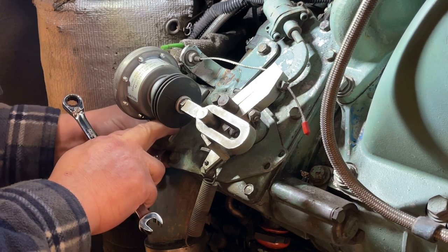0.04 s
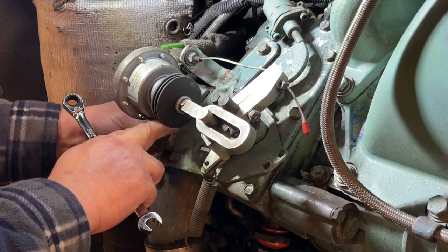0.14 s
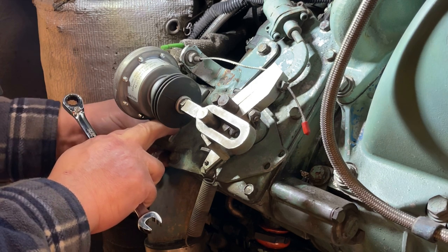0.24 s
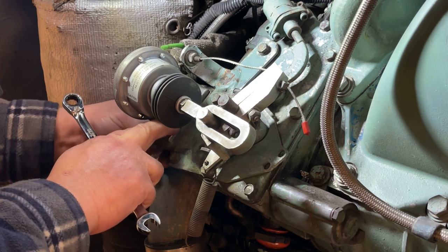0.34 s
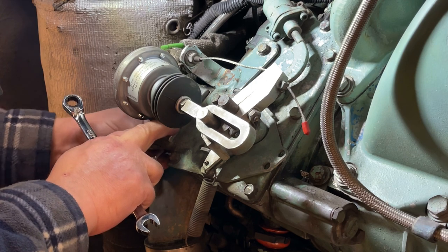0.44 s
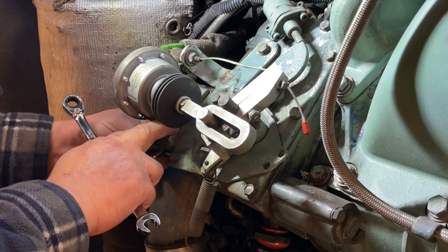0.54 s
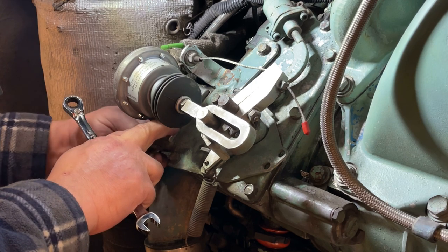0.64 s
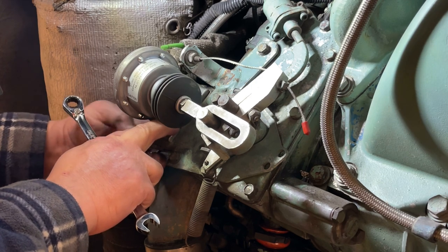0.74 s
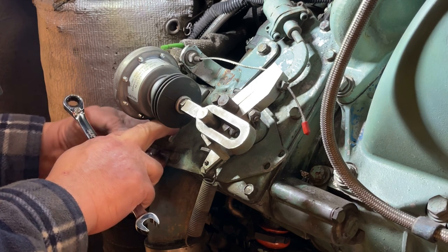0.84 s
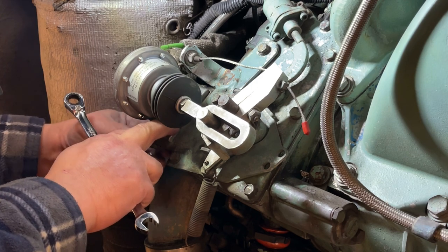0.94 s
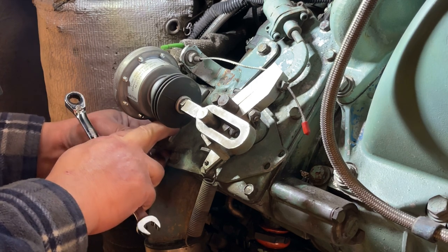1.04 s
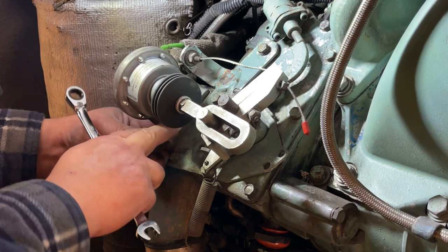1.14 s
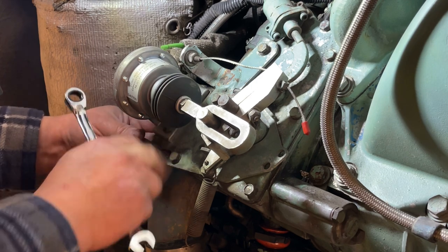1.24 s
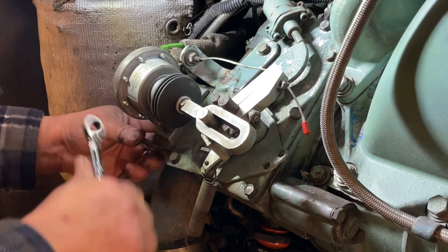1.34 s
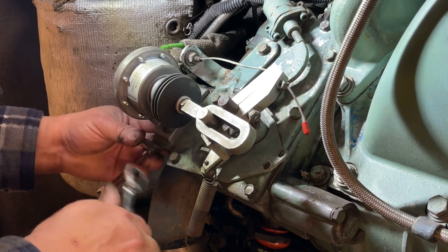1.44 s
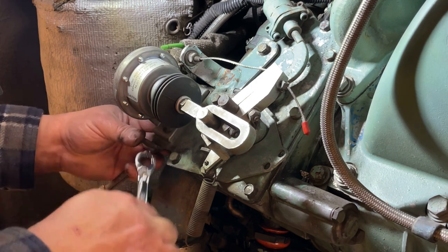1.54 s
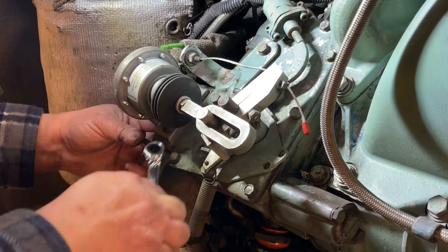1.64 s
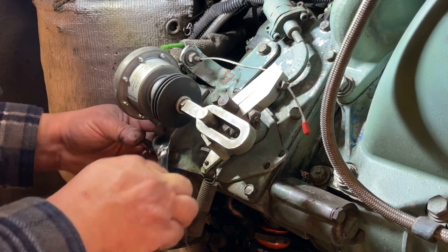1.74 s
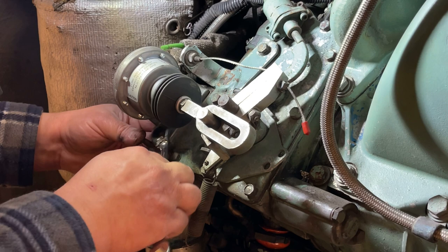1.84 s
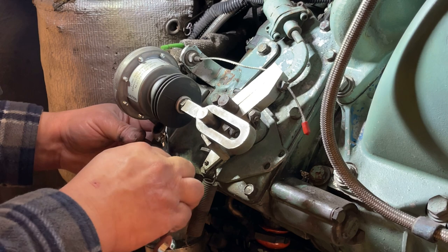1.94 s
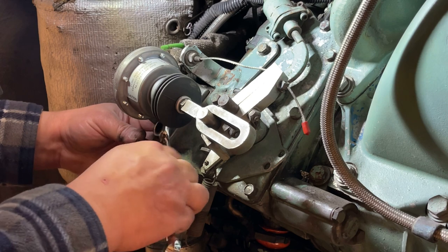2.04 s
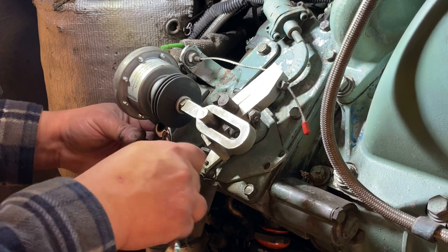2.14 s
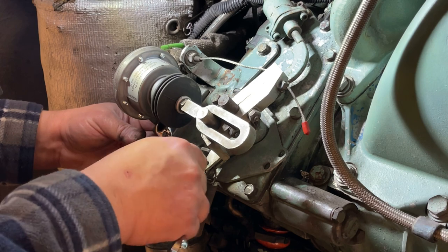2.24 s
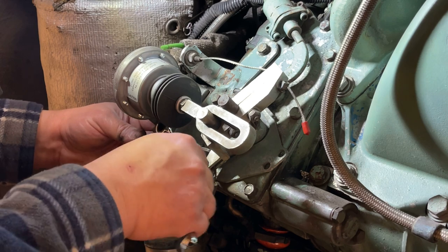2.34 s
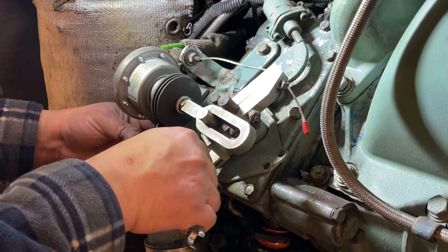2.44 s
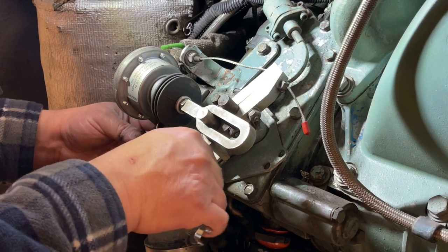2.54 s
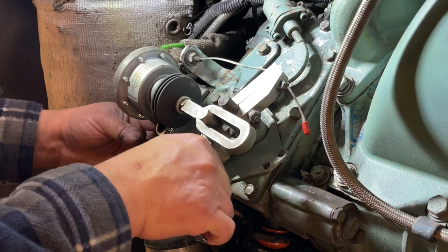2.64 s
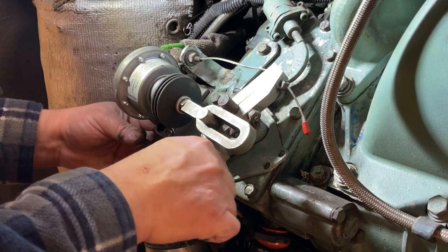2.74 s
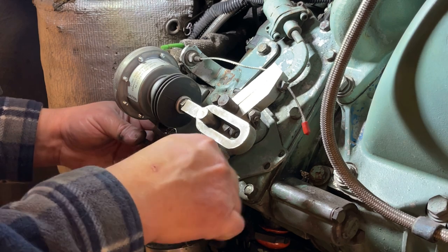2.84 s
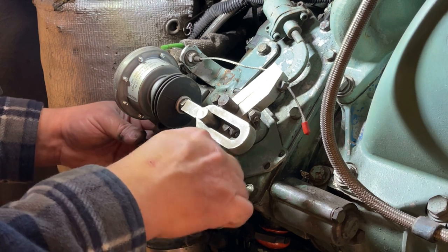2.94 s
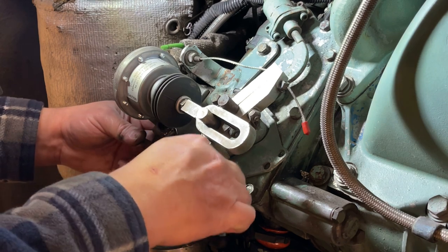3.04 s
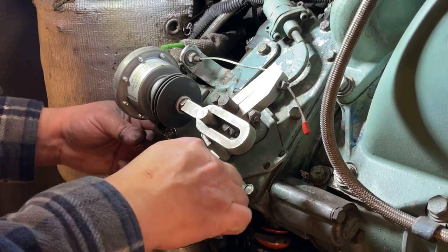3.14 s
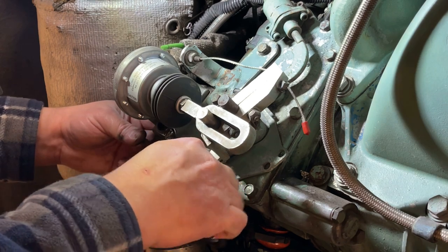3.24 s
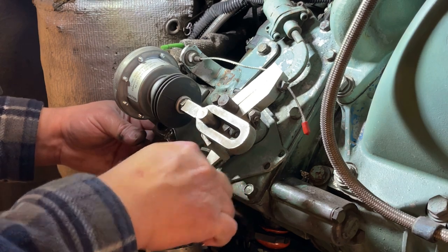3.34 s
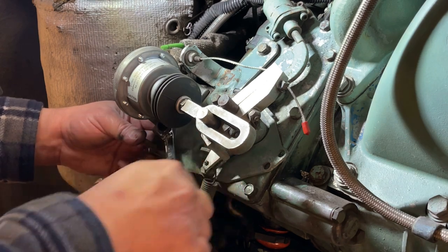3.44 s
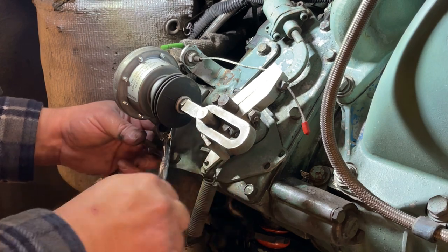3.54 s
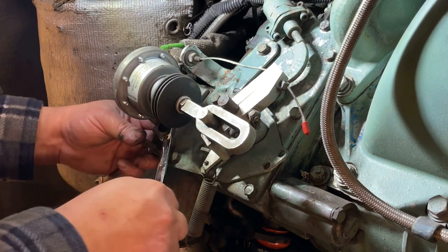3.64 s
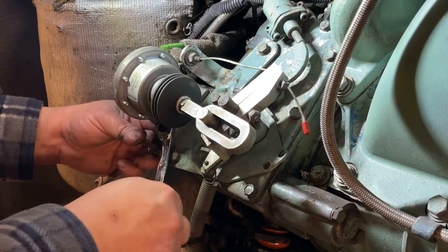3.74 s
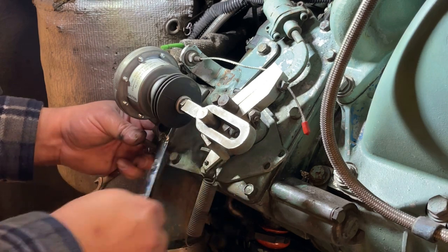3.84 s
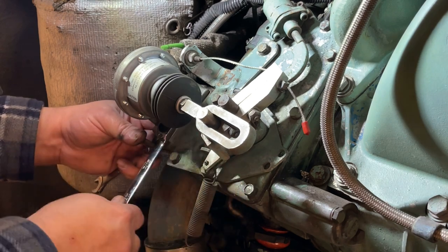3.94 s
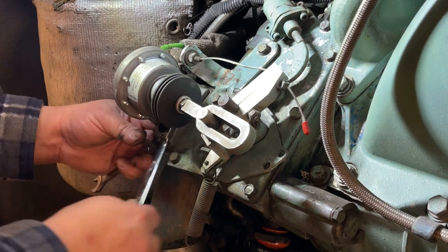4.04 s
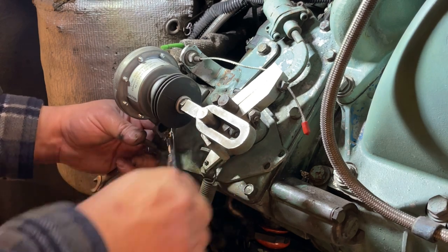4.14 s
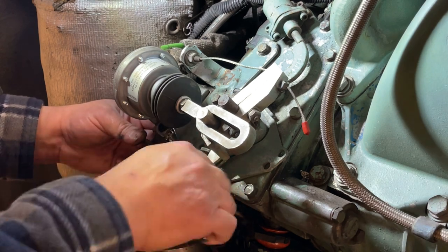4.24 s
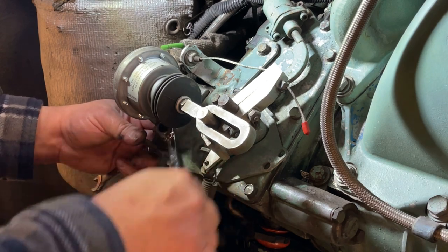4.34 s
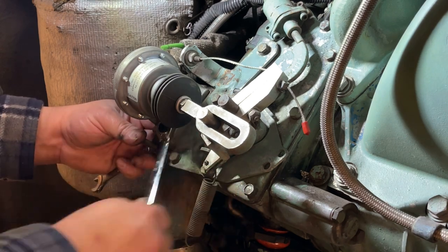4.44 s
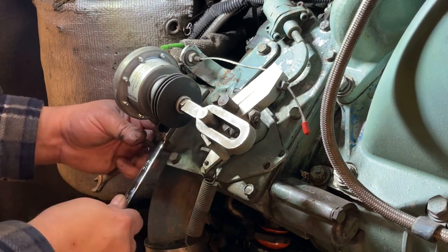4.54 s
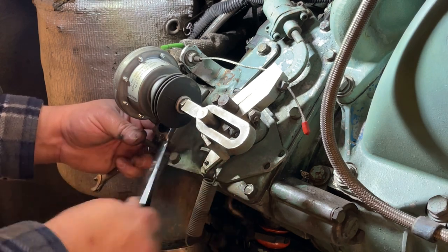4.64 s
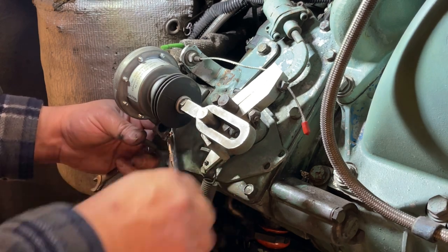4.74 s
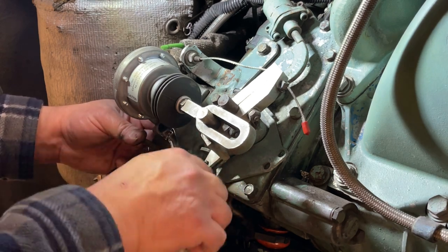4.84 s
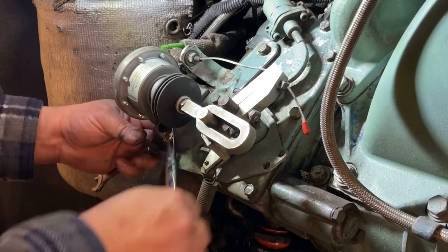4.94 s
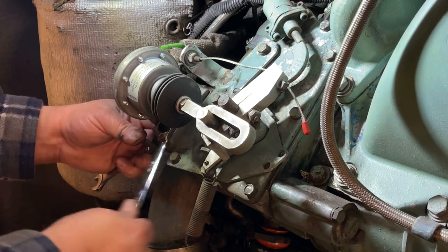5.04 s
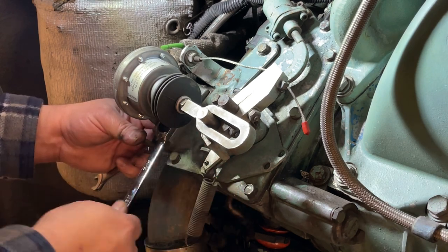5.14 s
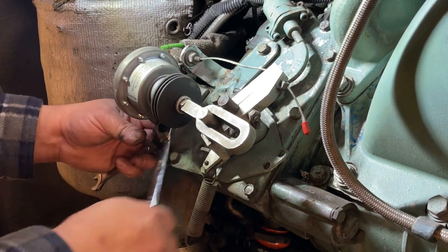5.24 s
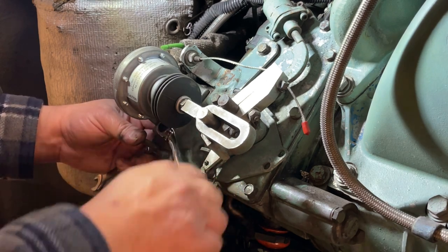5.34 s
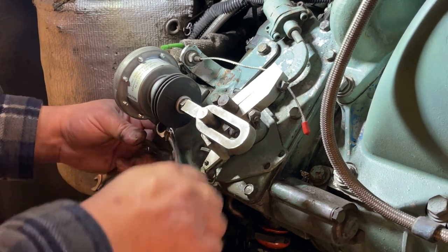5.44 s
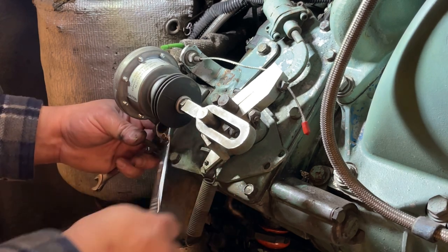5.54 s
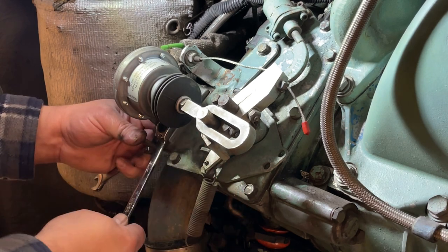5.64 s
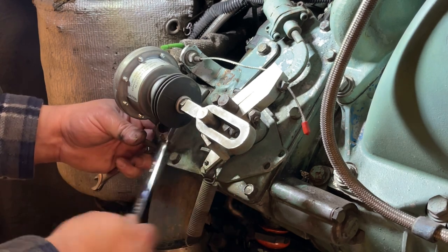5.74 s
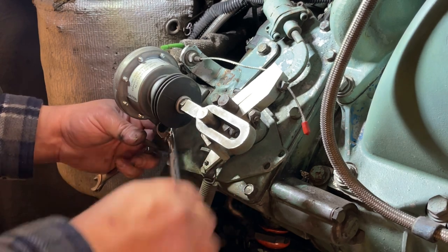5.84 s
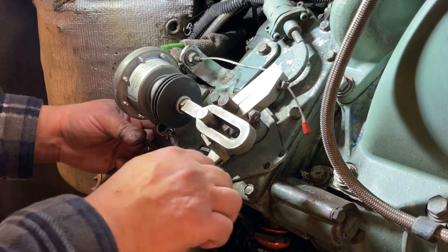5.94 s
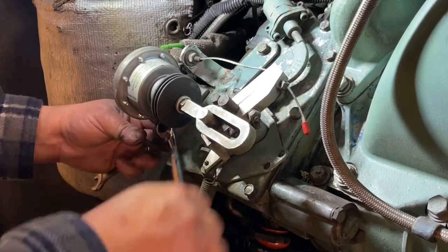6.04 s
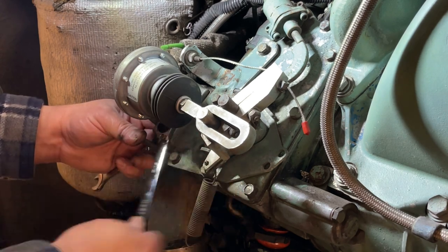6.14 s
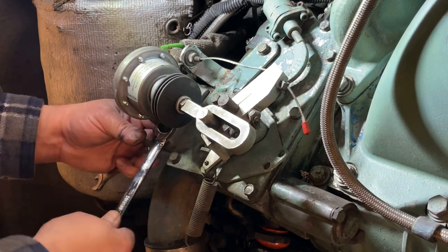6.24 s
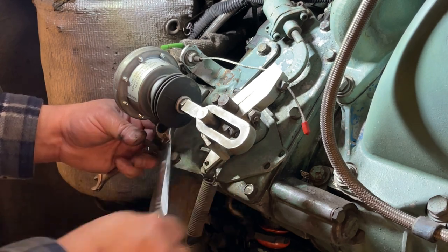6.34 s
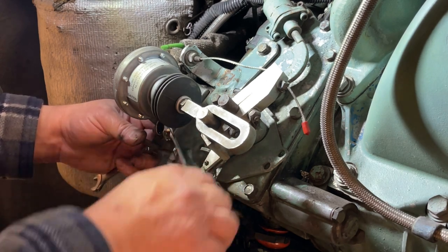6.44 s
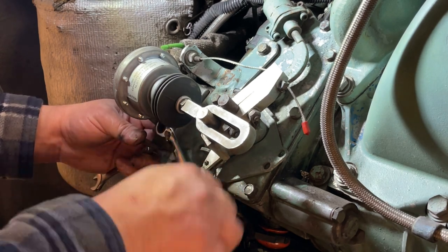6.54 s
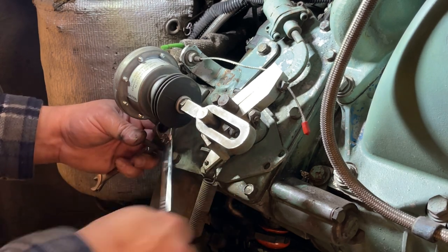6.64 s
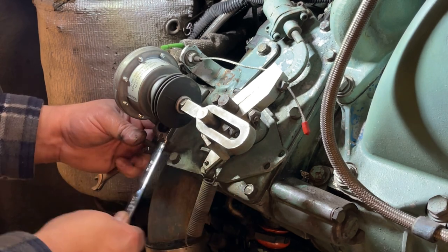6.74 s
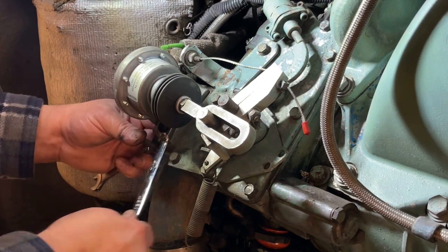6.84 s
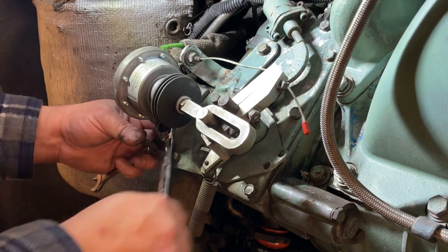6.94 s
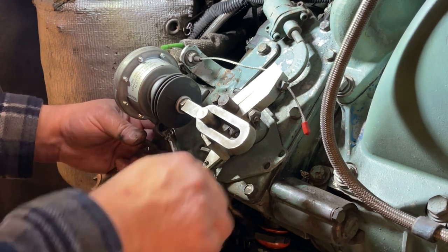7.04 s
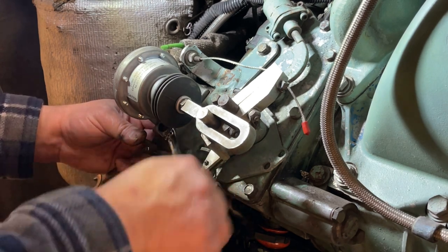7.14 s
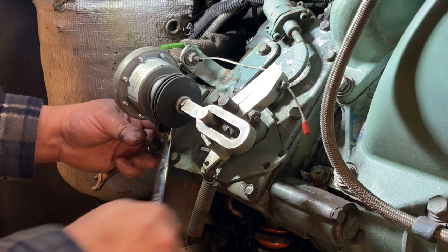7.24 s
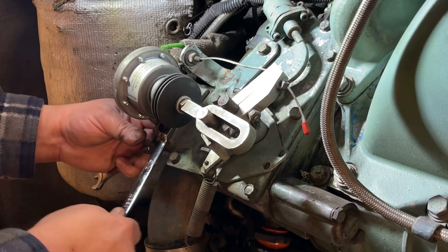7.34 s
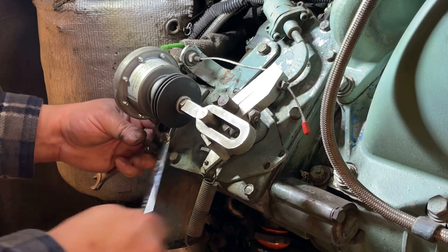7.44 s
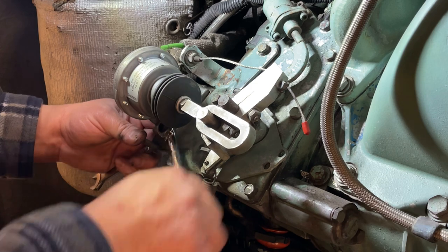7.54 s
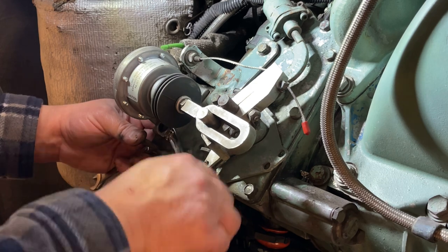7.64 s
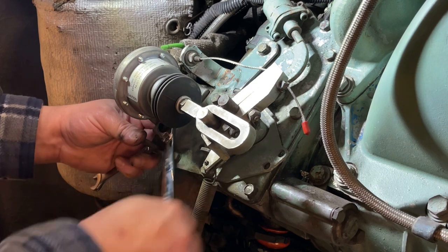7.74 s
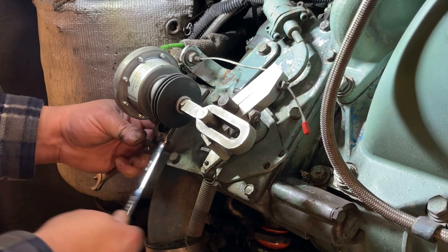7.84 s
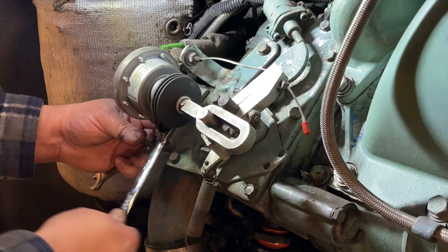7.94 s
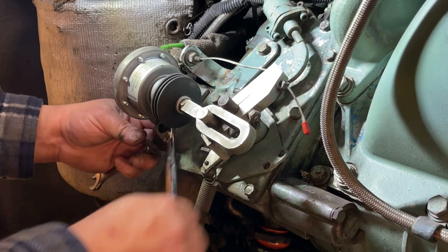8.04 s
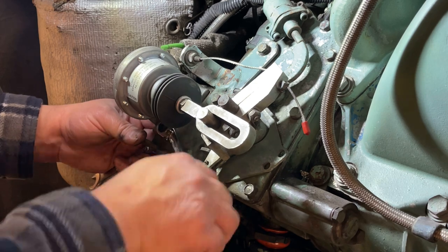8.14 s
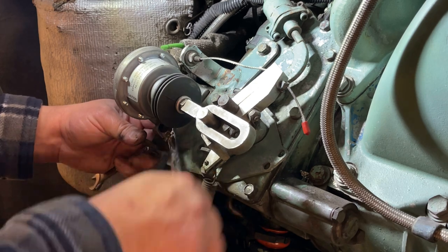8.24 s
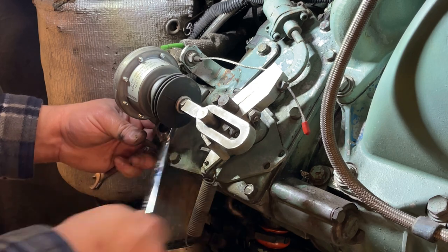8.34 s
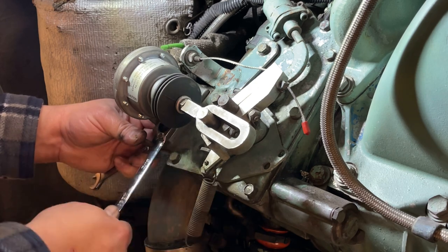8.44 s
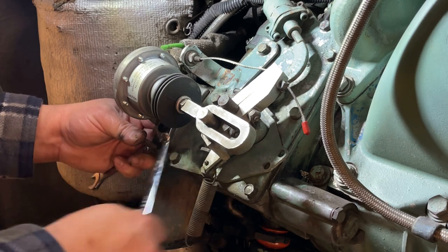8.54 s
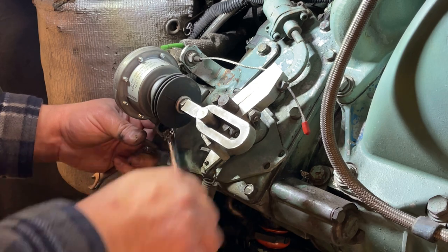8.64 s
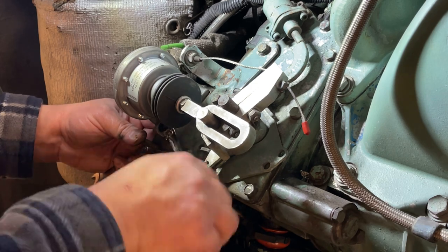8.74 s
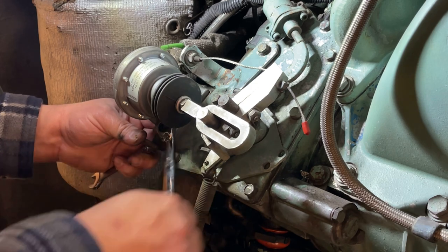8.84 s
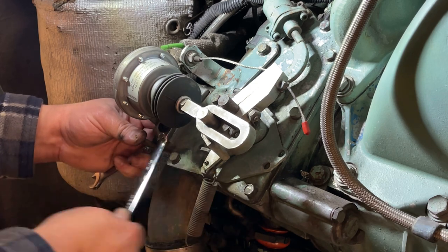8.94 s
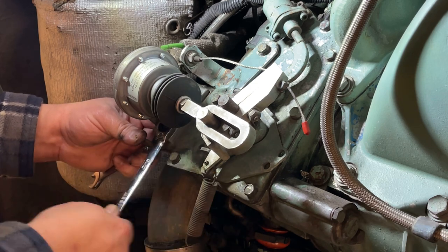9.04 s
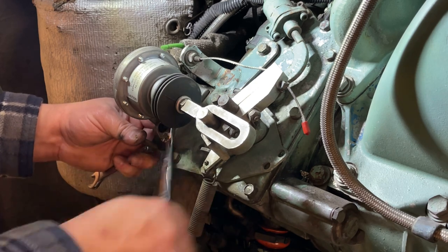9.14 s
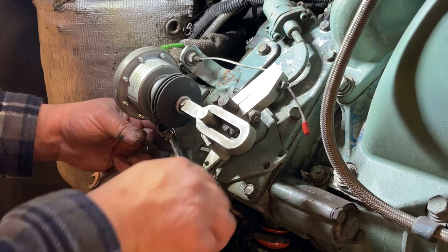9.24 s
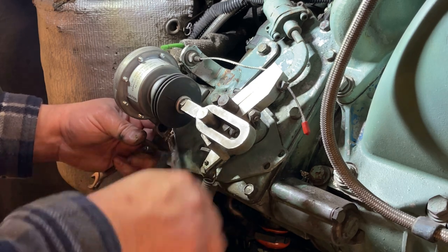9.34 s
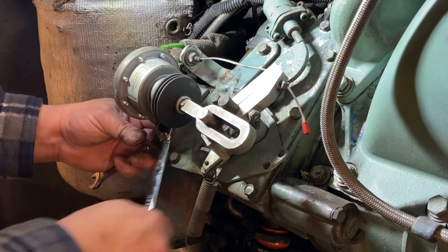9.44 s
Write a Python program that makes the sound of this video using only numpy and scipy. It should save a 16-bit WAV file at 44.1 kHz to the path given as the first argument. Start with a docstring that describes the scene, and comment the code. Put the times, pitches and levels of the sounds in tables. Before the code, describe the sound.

A ratcheting spanner is set on an engine bolt with taps and a sharp clank, then clicks through repeated swings in a small workshop.

```python
"""A small workshop with a low rumble. A ratcheting ring spanner is set on an engine bolt with a few
taps, faint scrapes and one sharp clank, then swung ten times. On each back swing the pawl rides up
and snaps over seven to nine teeth; between swings the spanner knocks on the bolt as it takes up load.
A sleeve rubs, engine parts scatter every click, and the room answers."""
import sys
import numpy as np
from scipy import signal
from scipy.fft import rfft, irfft, next_fast_len
from scipy.io import wavfile

SR = 44100
rng = np.random.default_rng(int(sys.argv[2]) if len(sys.argv) > 2 else 0)


def put_to_file(sound):
    """Save the sound as 16-bit audio at rate SR, in the file named by the first command-line argument."""
    columns = np.atleast_2d(sound).T  # one column per channel
    safe = np.clip(columns, -1, 1)
    whole_steps = np.round(safe * 32767)
    wavfile.write(sys.argv[1], SR, whole_steps.astype(np.int16))


N = 418509
HIT_SIZE = 8192
T = np.arange(HIT_SIZE) / SR
HZ = np.fft.rfftfreq(HIT_SIZE, 1 / SR)
# back swings: start/s, length/s, teeth, start and end speed over midway speed,
# first, middle and last click/dB, extra shank level/dB
SWINGS = [(4.0119, .18, 9, 1.09, .25, -23.5, -20.5, -25.5, 0),
          (4.6065, .1352, 8, 1.12, .44, -28, -21.5, -25, -1),
          (5.1794, .1156, 8, .98, .5, -27.5, -25, -27.5, -1),
          (5.7219, .1432, 9, 1.43, .49, -26, -24, -25, -2.5),
          (6.2734, .0865, 7, .86, .18, -26, -22, -29, -2.5),
          (6.844, .164, 8, .92, .59, -27, -22.5, -29.5, 1.5),
          (7.4028, .1304, 8, 1.26, .53, -26.5, -22.5, -26.5, 1.5),
          (7.9437, .1253, 9, .9, .24, -28.5, -23, -28, -2),
          (8.4944, .1421, 9, 1.57, .58, -23, -22.5, -25.5, -1.5),
          (9.0599, .135, 9, 1.28, .33, -30.5, -22.5, -25.5, -1)]


def amp(db):
    """Decibels to gain."""
    return 10 ** (np.asarray(db) / 20)


def unit(x):
    """Scale to rms 1."""
    return x / np.sqrt(np.mean(x ** 2) + 1e-20)


def along(points, hz):
    """Read (f/Hz, value) points on a log axis."""
    f, v = np.transpose(points)
    return np.interp(np.log(hz + 1), np.log(f + 1), v)


def filtered(x, response):
    """Apply a complex frequency response."""
    size = next_fast_len(N + SR // 2)
    return irfft(rfft(x, size) * response(np.fft.rfftfreq(size, 1 / SR)), size)[..., :N]


def coloured(x, colour):
    """Filter by (f/Hz, level/dB) points."""
    return filtered(x, lambda hz: amp(along(colour, hz)))


def add(track, start_s, sound):
    """Mix a sound into a track."""
    start = max(round(start_s * SR), 0)
    part = track[..., start:start + sound.shape[-1]]
    part += sound[..., :part.shape[-1]]


def below(edge_hz):
    """Soft mask: 1 under the edge, 0 above."""
    return 1 / (1 + (HZ / edge_hz) ** 10)


def peak(hz, centre_hz, width_hz):
    """Resonance curve of height 1."""
    return 1 / (1 + (2 * (hz - centre_hz) / width_hz) ** 2)


def noise_band(centre_hz, width_hz):
    """Noise through one resonance, rms 1."""
    return unit(filtered(rng.standard_normal(N), lambda hz: peak(hz, centre_hz, width_hz)))


def spread(pair):
    """Two unrelated signals become left and right of a diffuse sound."""
    side_colour = [(30, -20), (70, -24.5), (160, -10), (400, -7), (800, 1.5), (1500, -9.5), (5000, -17.5),
                   (11000, -9), (15000, -5)]  # side signal: f/Hz, level/dB
    side = coloured(pair[1], side_colour)
    return np.array([pair[0] + side, pair[0] - side])


def body(colour, modes, vary_db):
    """Response of a struck part in dB; each blow excites its resonances differently."""
    peaks = sum((db + vary_db * rng.standard_normal()) * peak(HZ, hz, width) for hz, width, db in modes)
    return along(colour, HZ) + peaks


def contact(t60_s, snap_db, scatter_db, scatter_t60_s, snap_t60_s=0.011, attack_s=0.00027):
    """Steel contact: bright snap, short chatter, dense reflections from the engine parts."""
    snap = np.diff(rng.standard_normal(HIT_SIZE + 1)) * amp(snap_db - 60 * T / snap_t60_s)
    decay = amp(-60 * T / t60_s) + amp(scatter_db - 60 * T / scatter_t60_s)
    return snap + decay * (1 - np.exp(-T / attack_s)) * rng.standard_normal(HIT_SIZE)


def strike(burst, response_db, lag_s, rms_samples):
    """A burst rings a causal body; the first rms_samples have rms 1."""
    cepstrum = irfft(np.log(amp(response_db) + 1e-6))
    causal = np.exp(rfft(cepstrum * np.r_[1, np.full(HIT_SIZE // 2 - 1, 2), np.zeros(HIT_SIZE // 2)]))
    # bending wave speed grows with the root of frequency: lows arrive later
    delay_s = lag_s * np.maximum(np.sqrt(SR / 4 / np.maximum(HZ, 300)) - 1, 0)
    sound = irfft(rfft(burst) * causal * np.exp(-2j * np.pi * np.cumsum(delay_s) * HZ[1]))
    fade = np.minimum(1, 2 * (1 - T / T[-1])) ** 2
    return sound * fade / np.sqrt(np.mean(sound[:rms_samples] ** 2))


def ringing(modes, vary_db):
    """Freely decaying modes, struck at varying strengths."""
    return sum(amp(db + vary_db * rng.standard_normal() - 60 * T / t60_s) * np.sin(2 * np.pi * hz * T)
               for hz, db, t60_s in modes)


def rumble(level_db=-54, drone_db=-58):
    """Steady low workshop noise with one wavering drone."""
    colour = [(20, -33.5), (32, -22), (45, -7), (62, -6.5), (73, -1.5), (90, -3.5), (120, -10.5),
              (200, -17.5), (400, -26), (800, -33), (1600, -44.5), (4000, -57), (11000, -54.5),
              (14000, -77.5)]  # room noise: f/Hz, level/dB
    bed = unit(coloured(rng.standard_normal((2, N)), colour))
    return amp(level_db) * spread(bed) + amp(drone_db) * noise_band(centre_hz=73, width_hz=14)


def workshop(x, build_s=0.0018):
    """Room tail, drawn anew every third of a second as the hands move."""
    decay = [(200, 0.22), (1000, 0.34), (2500, 0.6), (6500, 0.41), (11500, 0.28), (15000, 0.18)]  # reverberation: f/Hz, t60/s
    out = np.zeros((2, N))
    for start in range(0, N, SR // 3):
        hz, t, spectra = signal.stft(rng.standard_normal((2, SR * 2 // 3)), SR, nperseg=256)
        tail = signal.istft(spectra * amp(-60 * t / along(decay, hz)[:, None]), SR, nperseg=256)[1]
        tail *= 1 - np.exp(-np.arange(tail.shape[1]) / SR / build_s)
        tail /= np.linalg.norm(tail[0])
        add(out, start / SR, signal.fftconvolve(x[None, start:start + SR // 3], tail, axes=1))
    return spread(coloured(out, [(300, 3.5), (2000, -20.5), (6000, -22.5), (11000, -20.5)]))


def rubbing(slides, colour, grit_db, slips_per_s):
    """Tiny uneven slips under a pressure that swells and fades with each slide."""
    t = np.arange(N) / SR
    pressure = sum(amp(db) * np.cos(np.pi * np.clip((t - middle_s) / length_s, -.5, .5))
                   for middle_s, length_s, db in slides)
    slips = np.interp(t * slips_per_s, np.arange(N), amp(grit_db * rng.standard_normal(N)))
    return pressure * unit(coloured(slips * rng.standard_normal(N), colour))


def sleeve():
    """Flannel rubs smoothly as the arm pushes."""
    slides = [(3.72, 0.74, -77.5), (6.06, 0.64, -76), (6.75, 0.45, -63.5), (7.82, 0.12, -69.5),
              (8.37, 0.7, -77.5)]  # rubs: middle/s, length/s, level/dB
    colour = [(200, -12.5), (700, -12), (1400, 1.5), (2300, 3), (4000, -9), (7500, -12), (9300, -7),
              (11300, -4.5), (13500, -56.5)]  # cloth friction: f/Hz, level/dB
    return rubbing(slides, colour, grit_db=0.5, slips_per_s=220)


def scrapes():
    """Steel grates on steel while the ring feels for the bolt."""
    slides = [(.46, 0.2, -68.5), (.56, 0.079, -64), (1.06, 0.037, -77), (1.87, 0.2, -68),
              (2.035, 0.053, -60), (2.745, 0.14, -61.5), (3.042, 0.019, -63)]  # scrapes: middle/s, length/s, level/dB
    colour = [(100, -51), (350, 11), (800, 0), (1300, -2.5), (2800, -10.5), (5000, -19), (11000, -17.5),
              (14000, -39)]  # steel friction: f/Hz, level/dB
    return rubbing(slides, colour, grit_db=2.5, slips_per_s=380)


def slack(release_s=.018, take_up_s=.125, level_db=(-62, -59.5), treble_db=-1.5):
    """The ring unloads before each swing and takes up load after it: t/s, level/dB, treble/dB."""
    releases = [(start - release_s, level_db[0], treble_db) for start, *_ in SWINGS]
    take_ups = [(start + length + take_up_s, level_db[1], treble_db) for start, length, *_ in SWINGS]
    return releases + take_ups


def knocks():
    """The spanner knocks on bolt and casing; hard contact is brighter and makes the loose tool clink."""
    blows = [(0.535, -59, -1), (0.574, -60, -7), (1.811, -59, -12), (1.843, -60, -8), (1.978, -43, 7),
             (2.034, -52, -7), (2.726, -56, -3), (2.768, -41, 10), (3.805, -55, 10), (4.436, -59, -2),
             (4.468, -49, -4), (4.55, -47, -1), (5.033, -43, -1), (5.119, -35, 3), (5.575, -47, -16),
             (5.682, -37, -1), (6.144, -47, -8), (6.53, -52, -4), (6.564, -39, 4), (6.569, -27, -1),
             (6.867, -43, -5), (7.858, -60, -4), (8.947, -57, -13)]  # knocks: t/s, level/dB, treble/dB
    colour = [(100, -20.5), (290, -6), (520, 4.5), (720, -8.5), (1300, -3.5), (3000, -1.5), (4500, -5.5),
              (8000, -11), (12000, -12.5), (13500, -28.5), (16500, -43.5)]  # broad knock spectrum: f/Hz, level/dB
    casing_modes = [(370, 81, 8.5), (956, 390, 13), (1545, 190, 1.5), (2010, 470, 4.5), (4340, 790, 0),
                    (5390, 280, 9), (6300, 320, 4), (9200, 730, 8), (10530, 340, 17)]  # bolt and casing: f/Hz, width/Hz, boost/dB
    clink_modes = [(4500, -20.5, 0.11), (5400, -28.5, .1), (6020, -28, 0.13), (9200, -26.5, 0.034)]  # loosely held spanner: f/Hz, level/dB, t60/s
    out = np.zeros(N)
    for start_s, db, treble_db in blows + slack():
        thud_db = 0.31 * (-49.5 - db) - 0.44 * treble_db  # softer and duller knocks thud more
        response_db = body(colour, casing_modes, vary_db=4) + thud_db * below(edge_hz=1450)
        response_db += (treble_db + 2) * (1 - below(edge_hz=3860))
        burst = contact(t60_s=0.018, snap_db=-12, scatter_db=-10.5, scatter_t60_s=0.11)
        blow = strike(burst, response_db, lag_s=.0003, rms_samples=SR // 100)
        clink = amp(min(treble_db, 4)) * ringing(clink_modes, vary_db=2)
        add(out, start_s, amp(db) * (blow + clink))
    return out


def clank(gain_db=1, ring_db=-33.5, ring_t60_s=0.44):
    """The ring snaps home and rings the bolt; a cluster of close high modes lingers."""
    blows = [(3.44, -18)]  # seating blow: t/s, level/dB
    colour = [(100, -41.5), (350, -13), (600, -19), (1500, -7.5), (2800, -4), (4100, -8), (5300, 0),
              (8000, 2.5), (10500, 2.5), (12300, 1), (13500, -8.5), (15200, -16.5), (16800, -40.5)]  # broad clank spectrum: f/Hz, level/dB
    seated_modes = [(1010, 140, 9), (2000, 160, 7), (5445, 430, -1), (6173, 430, 10.5), (6750, 660, 12),
                    (8420, 370, 9.5), (9410, 500, 10), (11460, 900, 14)]  # ring on the bolt head: f/Hz, width/Hz, boost/dB
    bolt_modes = [(345, -38, .09), (975, -18.5, .028), (2030, -15.5, .022), (2600, -21.5, .02)]  # bolt and boss: f/Hz, level/dB, t60/s
    out, t = np.zeros(N), np.arange(N) / SR
    for start_s, db in blows:
        burst = contact(t60_s=0.0105, snap_db=0.5, scatter_db=-14, scatter_t60_s=0.09)
        response_db = body(colour, seated_modes, vary_db=3.5)
        crack = strike(burst, response_db, lag_s=0.00027, rms_samples=SR // 200)
        add(out, start_s, amp(db + gain_db) * (crack + ringing(bolt_modes, vary_db=5.5)))
        cluster = noise_band(centre_hz=6550, width_hz=1500)
        add(out, start_s, amp(db + ring_db - 60 * t / ring_t60_s) * cluster)
    return out


def arch(first, middle, last, angle):
    """Parabola over a swing whose angle runs from 0 to 1."""
    return np.polyval(np.polyfit([0, .5, 1], [first, middle, last], 2), angle)


def teeth(level_vary_db=0.05, head_vary_db=4, end_shank_db=3.5):
    """Evenly spaced, unlike teeth pass at hand speed: t/s, level/dB, ring head/dB, shank/dB."""
    drops = []
    for start_s, length_s, count, start_speed, end_speed, *click_db, shank_db in SWINGS:
        angle = np.linspace(0, 1, count)
        speed = arch(start_speed, 1, end_speed, (angle[:-1] + angle[1:]) / 2)
        elapsed = np.r_[0, np.cumsum(1 / speed)]
        level_draw, head_draw = rng.standard_normal((count, 2)).T
        drops += zip(start_s + length_s * elapsed / elapsed[-1],
                     arch(*click_db, angle) - level_vary_db * level_draw,
                     head_vary_db * head_draw,
                     shank_db + arch(end_shank_db, 0, end_shank_db, angle))
    return drops


def riding(drops, gain_db=-33, rise_s=0.014):
    """Before each drop the pawl grates up the tooth flank, harder as its spring loads."""
    colour = [(150, -35.5), (400, 1.5), (800, 5.5), (2200, -5), (4500, -11), (9000, -4),
              (12000, -5.5), (14000, -34)]  # f/Hz, level/dB
    pressure = np.zeros(N)
    ramp = np.linspace(0, 1, round(rise_s * SR))
    for drop_s, db, _, _ in drops:
        add(pressure, drop_s - rise_s, amp(db + gain_db) * ramp)
    return pressure * unit(coloured(rng.standard_normal(N), colour))


def ratchet(drops, path_share=0.36, swing_gap_s=.2):
    """The pawl snaps tooth by tooth; clicks of one swing share part of their path through the engine."""
    colour = [(100, -22.5), (300, -15.5), (550, -11), (750, -24), (1400, -15.5), (3000, -9), (5000, -5.5),
              (8300, 0), (10400, 8.5), (11800, 5), (13200, -16), (14400, -19), (15600, -22), (16800, -44)]  # broad click spectrum: f/Hz, level/dB
    spanner_modes = [(384.4, 43, 14), (1038, 410, 10), (1990, 470, 10.5), (2517, 300, 7), (3740, 610, 5),
                     (4270, 230, 6.5), (5530, 640, 5.5), (6120, 180, 8), (6674, 100, 10.5), (7670, 590, 3),
                     (9170, 260, 8.5), (11070, 470, 9.5), (13200, 900, 11)]  # pawl and spanner: f/Hz, width/Hz, boost/dB
    shank_band = below(edge_hz=4000) - below(edge_hz=760)
    head_band = below(edge_hz=8400) - below(edge_hz=4000)
    out, last_s = np.zeros(N), -1
    for drop_s, db, head_db, shank_db in drops:
        own, fresh = [contact(t60_s=0.013, snap_db=3, scatter_db=-13, scatter_t60_s=0.098)
                      for _ in range(2)]
        if drop_s - last_s > swing_gap_s:
            shared = fresh
        last_s = drop_s
        response_db = body(colour, spanner_modes, vary_db=1.5)
        response_db += (head_db - 0.34) * head_band + (shank_db - 1.5) * shank_band
        burst = np.sqrt(path_share) * shared + np.sqrt(1 - path_share) * own
        add(out, drop_s, amp(db) * strike(burst, response_db, lag_s=.00065, rms_samples=SR // 200))
    return out


def scene():
    """The tool straight ahead, the room around it."""
    drops = teeth()
    tool = ratchet(drops) + riding(drops) + knocks() + clank() + scrapes() + sleeve()
    return tool + workshop(tool) + rumble()


def record(dry, top_hz=16700):
    """Two microphone ports turn the treble's phase apart; nothing passes above the band limit."""
    port_phase = [(2200, 0), (3200, -.5), (5400, -.7), (7000, -.45), (8300, -.85), (8950, .2), (9800, 2),
                  (10400, np.pi), (12000, 2 * np.pi), (13550, 3 * np.pi), (15000, 4 * np.pi)]  # phase between ports: f/Hz, left lead/rad

    def response(hz):
        lead_rad = np.interp(hz, *np.transpose(port_phase))
        return np.exp(.5j * np.outer([1, -1], lead_rad)) * (hz < top_hz)
    return filtered(dry, response)


dry = scene()
out = record(dry)
put_to_file(out)
```